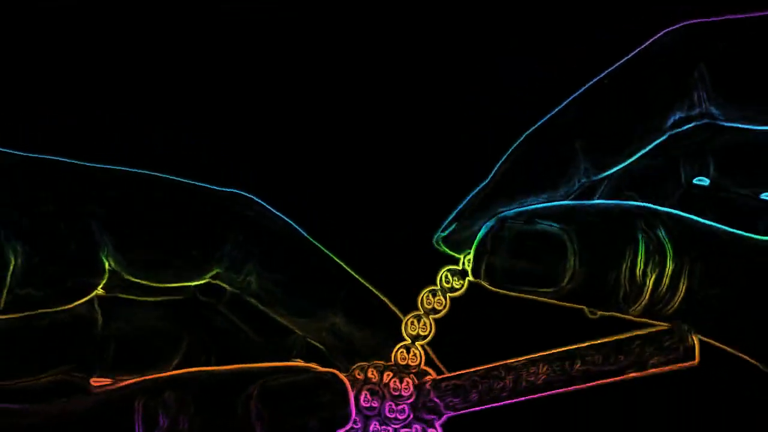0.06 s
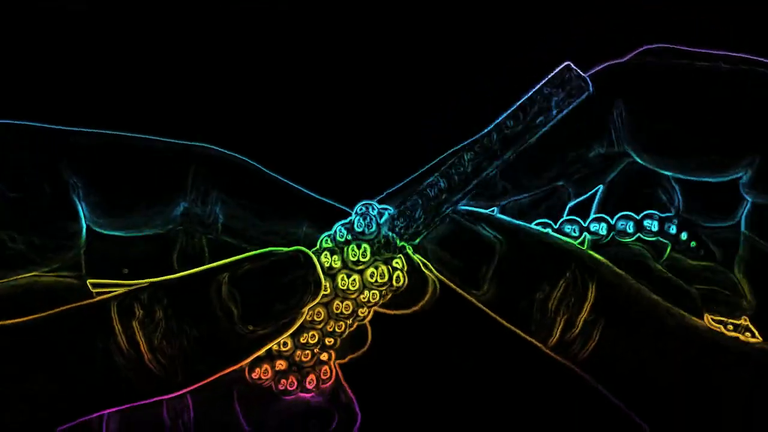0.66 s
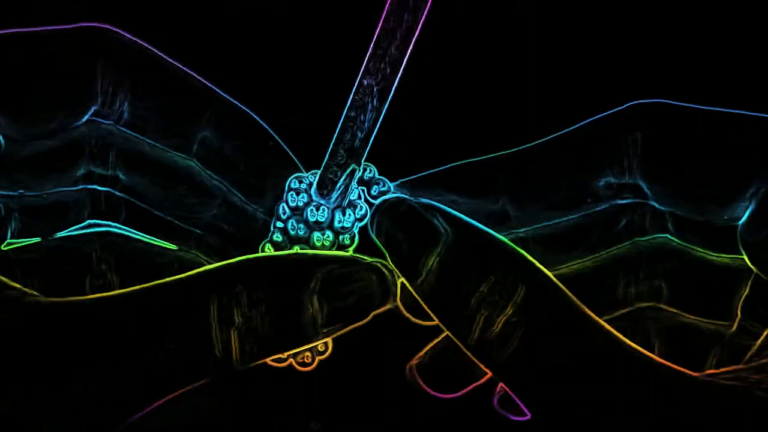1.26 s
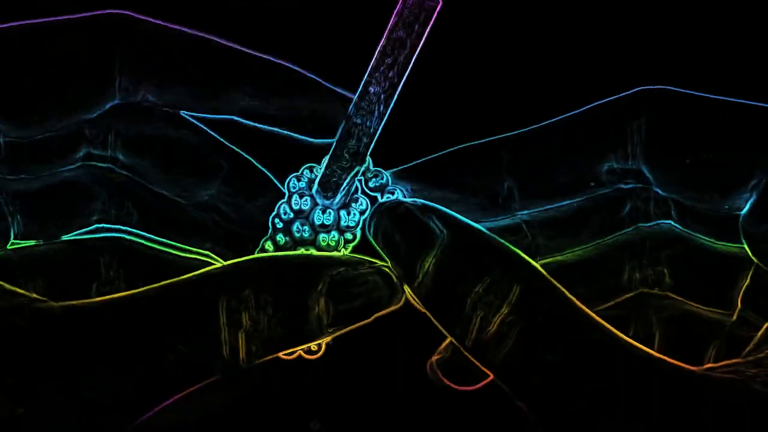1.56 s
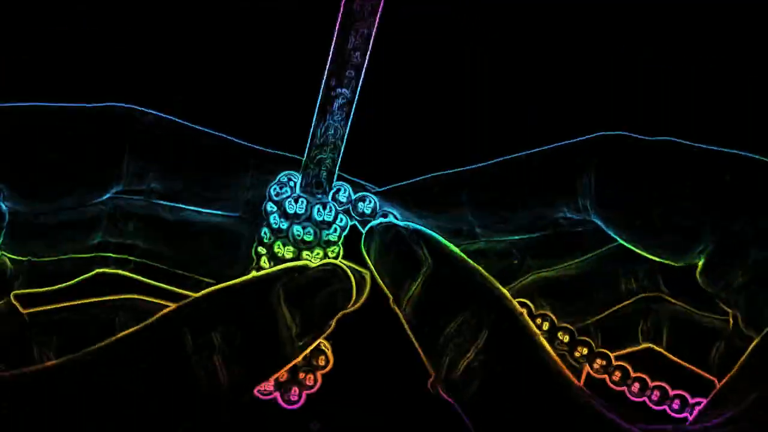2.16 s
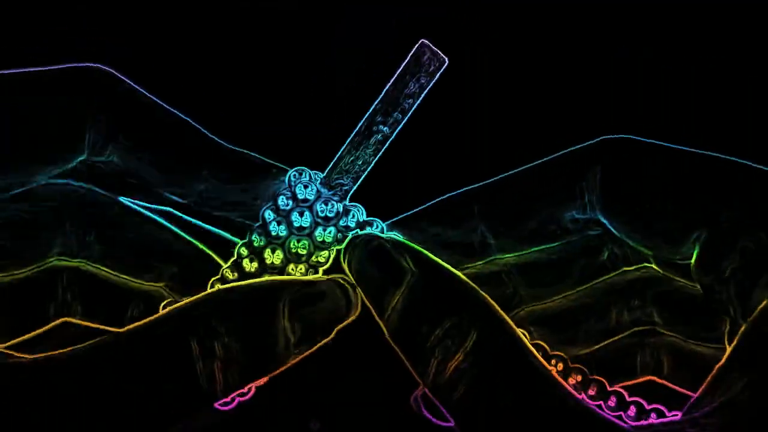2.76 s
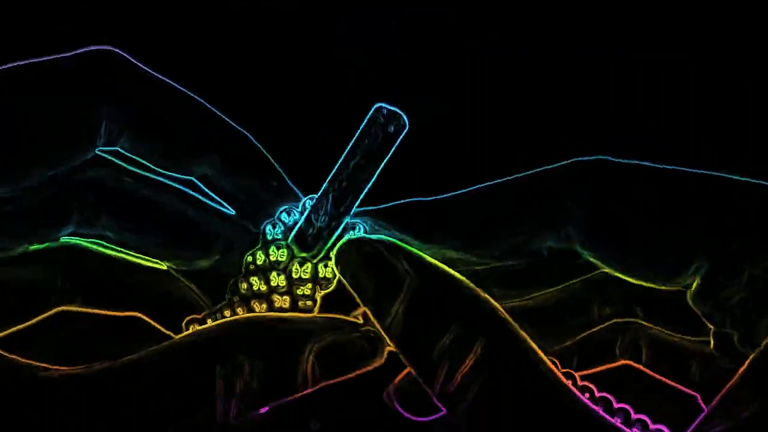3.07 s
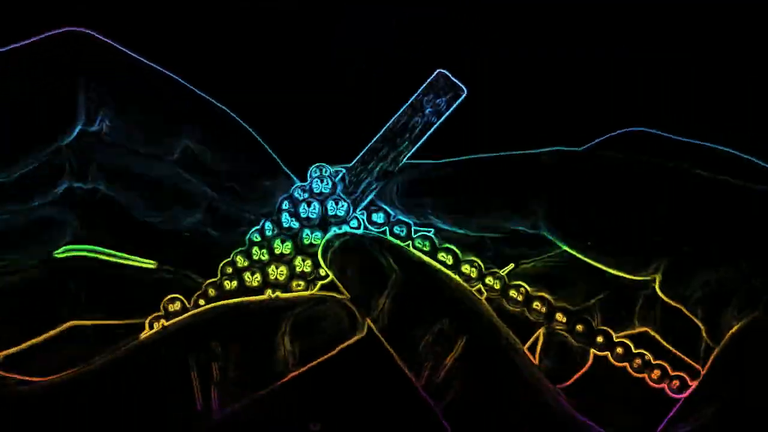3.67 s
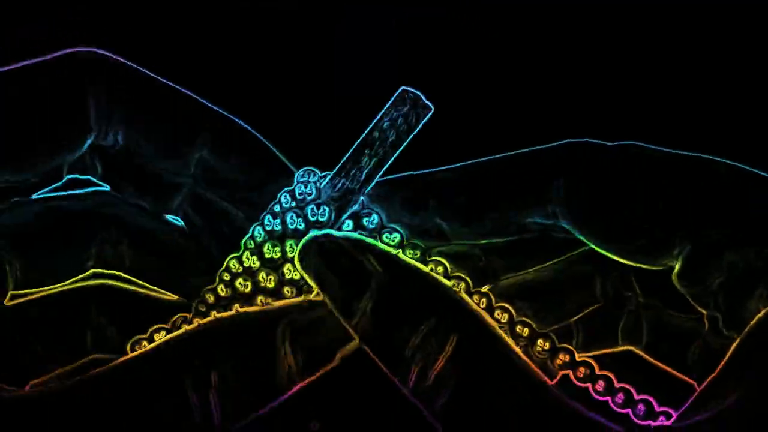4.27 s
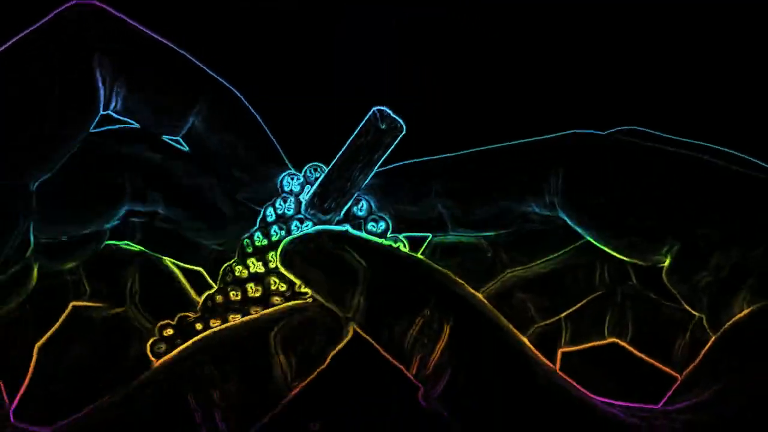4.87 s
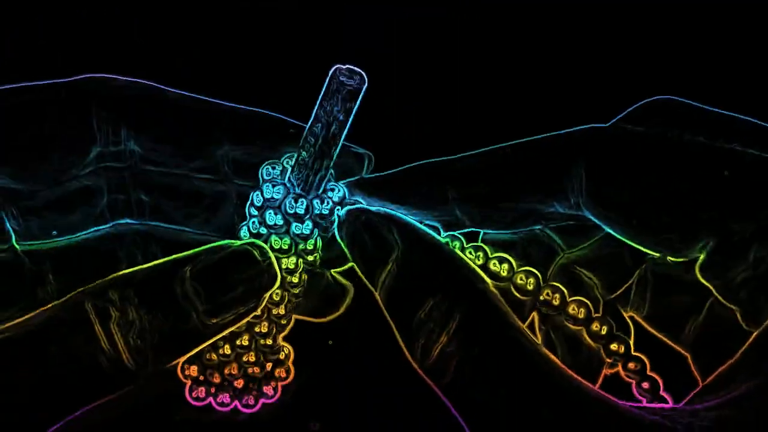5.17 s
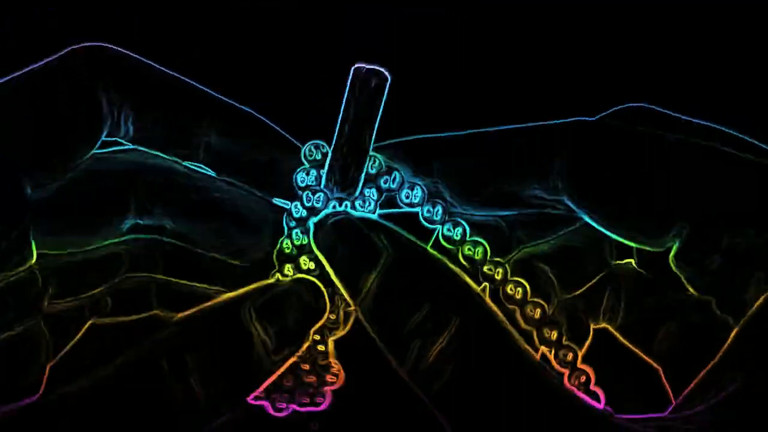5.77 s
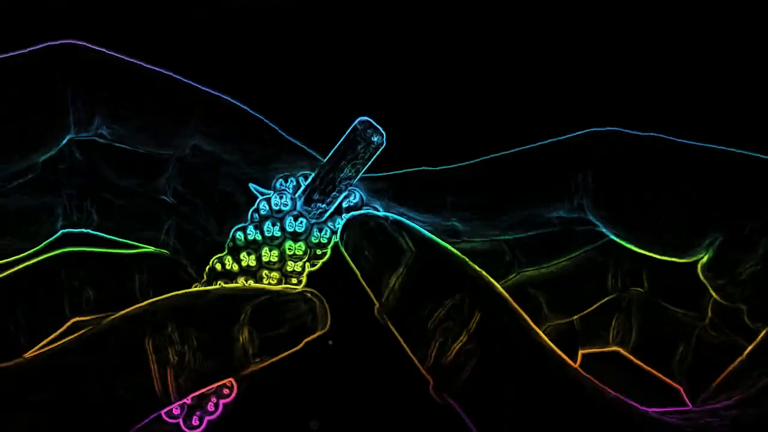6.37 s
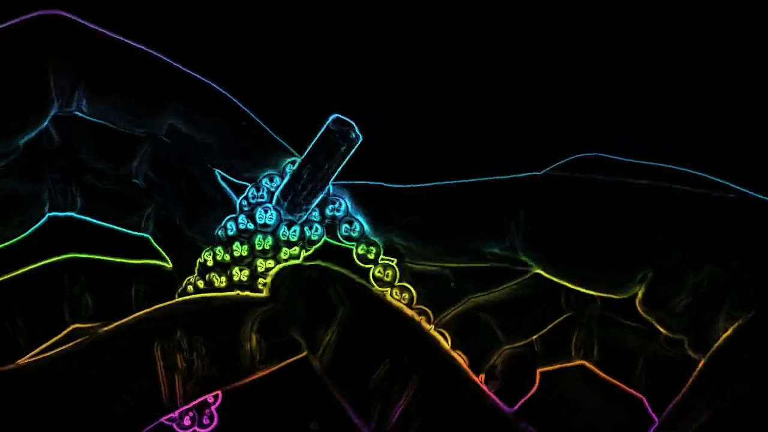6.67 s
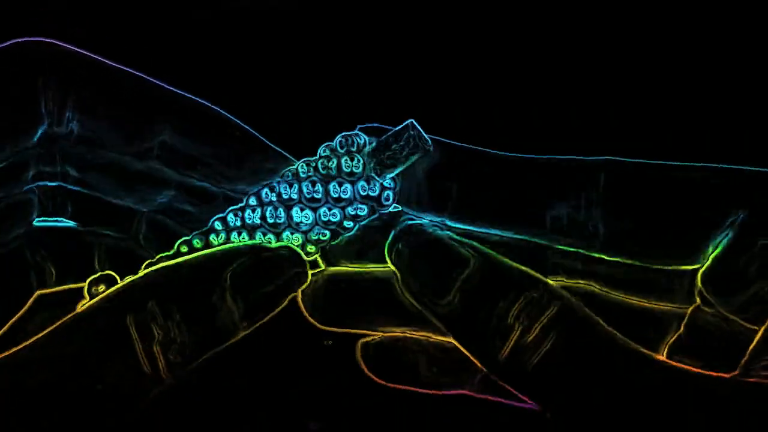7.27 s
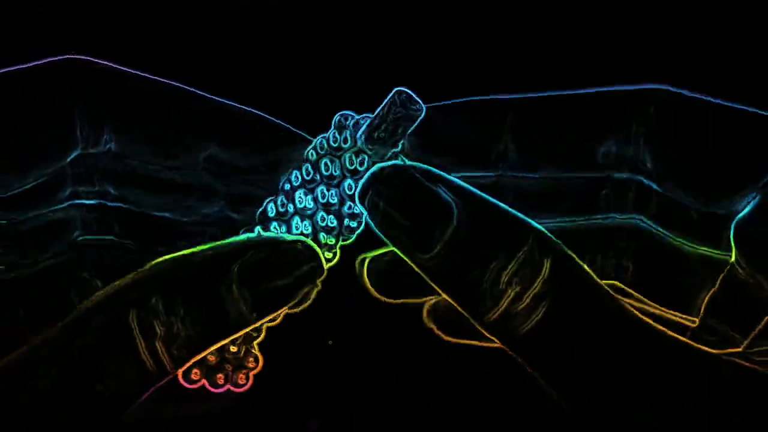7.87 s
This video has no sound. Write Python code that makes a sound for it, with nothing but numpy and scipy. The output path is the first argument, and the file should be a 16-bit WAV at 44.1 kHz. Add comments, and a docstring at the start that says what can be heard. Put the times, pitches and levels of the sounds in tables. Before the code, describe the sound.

Close, irregular clicks and sharp metallic snaps of little magnetic balls joining together, between soft finger swishes and hand rustles.

```python
"""A quiet, dry room; close to the microphone, fingers wind a chain of small magnetic balls round a rod.
Balls jump onto the cluster with sharp snaps or settle with soft ticks: the packed steel rings and the rod
knocks. In between, balls slide on each other and fingertips swish over them, at times with a faint squeak.
The hands add dull rustles over a low room rumble. The loudest snap overloads the microphone input."""
import sys
import numpy as np
from scipy import signal
from scipy.fft import rfft, irfft, next_fast_len
from scipy.io import wavfile

SR = 44100
rng = np.random.default_rng(int(sys.argv[2]) if len(sys.argv) > 2 else 0)


def wrap_up_sound(samples):
    """Save the sound to the file named by the first command line argument, as 16-bit audio."""
    columns = np.atleast_2d(samples).T
    # keep every value between -1 and 1, then stretch to whole-number steps
    tamed = np.clip(columns, -1, 1)
    steps = np.round(tamed * 32767).astype(np.int16)
    wavfile.write(sys.argv[1], SR, steps)


N = 348831
TIME = np.arange(N) / SR

# balls landing on the cluster: t/s, ring level/dB, ring f/Hz, hardness/dB (adds crack), rod knock level/dB
LANDINGS = [(.6343, -54, 5200, -24, -67), (0.6453, -46.5, 4940, -30, -65), (0.655, -48, 5430, -22, -53),
            (.7082, -22.5, 8000, 9, -30), (.9737, -23.5, 7000, 2, -34.5), (1.0693, -24, 5300, -12, -48),
            (2.0513, -20, 7460, -9, -44.5), (2.4061, -23.5, 6770, -14, -44), (2.6599, -31, 6730, -24, -43),
            (3.0023, -43, 1650, -6, -57), (3.176, -30, 3700, -38, -52), (3.2292, -46, 3800, -35, -57),
            (3.423, -19.5, 3060, 1.5, -37), (3.6664, -57.5, 1790, -4, -57.5),
            (3.8269, -46.5, 6700, -16, -53), (4.1237, -31, 2350, -18, -34), (4.296, -56.5, 5450, -14, -55),
            (5.2625, -19, 3200, -.5, -55), (5.4747, -35, 2940, -45, -72), (5.5145, -30.5, 3830, -50, -59),
            (5.6469, -38, 3800, -42, -58.5), (5.7386, -17, 4250, -12, -47), (5.9971, -41, 3200, -38, -62),
            (6.1152, -59, 4490, -33, -77), (6.3086, -57, 4840, -22, -60.5), (6.6365, -12, 4500, -5, -44),
            (6.6467, -13.5, 4420, -6, -38), (6.7252, -43.5, 4640, -28, -63),
            (6.8766, -40, 4240, -40, -54.5), (6.889, -31.5, 4300, -42, -49),
            (7.0479, -29.5, 4400, -30, -44.5), (7.3507, 1, 5290, -3.5, -24)]


def from_db(db):
    """Decibels to gain."""
    return 10 ** (np.asarray(db) / 20)


def rms_one(x):
    """Scale to an rms of 1."""
    return x / np.sqrt(np.mean(x ** 2) + 1e-20)


def energy_one(x):
    """Scale to a total energy of 1."""
    return x / np.sqrt(np.sum(x ** 2) + 1e-20)


def add(track, s, sound):
    """Mix a sound into a track from second s on."""
    start = max(int(round(s * SR)), 0)
    part = sound[:max(N - start, 0)]
    track[start:start + len(part)] += part


def band(x, low_hz, high_hz, order=2):
    """Causal band-pass."""
    sections = signal.butter(order, [low_hz, min(high_hz, .45 * SR)], "band", fs=SR, output="sos")
    return signal.sosfilt(sections, x + 1e-18)


def resonance(x, low_hz, high_hz):
    """One resonance, 3 dB down at the two given frequencies."""
    low, high = np.tan(np.pi * np.minimum([low_hz, high_hz], .45 * SR) / SR)
    width, centre = high - low, low * high
    feedback = [1 + width + centre, 2 * (centre - 1), 1 - width + centre]
    return signal.lfilter([width, 0, -width], feedback, x + 1e-18)


def steep_resonance(x, hz, spread):
    """A resonance applied twice, so that its skirts are steep."""
    edges_hz = hz / (1 + spread), hz * (1 + spread)
    return resonance(resonance(x, *edges_hz), *edges_hz)


def coloured_noise(colour, size):
    """Noise of rms 1 whose spectrum follows rows of f/Hz, level/dB."""
    hz, db = np.transpose(colour)
    padded = next_fast_len(size)
    bins_hz = np.maximum(np.fft.rfftfreq(padded, 1 / SR), 1)
    gain = from_db(np.interp(np.log(bins_hz), np.log(hz), db))
    low_cut = np.minimum(bins_hz / hz[0], 1) ** 2
    spectrum = rfft(rng.standard_normal(padded)) * gain * low_cut
    return rms_one(irfft(spectrum, padded)[:size])


def room_tone():
    """The room's low rumble and a faint, steady hum."""
    # rumble spectrum: f/Hz, relative level/dB
    rumble_colour = [(18, 0.5), (38, 1), (52, -11), (70, -13), (105, -28.5), (220, -24.5), (550, -42),
                     (1200, -51), (2300, -56.5), (4000, -58.5), (8000, -64), (16000, -73)]
    rumble_db, hum_db, hum_hz = -54.5, -76.5, 295
    rumble = from_db(rumble_db) * coloured_noise(rumble_colour, N)
    hum = from_db(hum_db) * np.sqrt(2) * np.sin(2 * np.pi * hum_hz * TIME)
    return rumble + hum


def reflections(x, early_db, early_t60, late_db, late_t60):
    """Dense first reflections from hands and table, then a short faint tail from the walls."""
    # spectra of the first reflections and of the tail: f/Hz, relative level/dB
    early_colour = [(300, 0), (800, 1.5), (1500, 2.5), (3500, 1.5), (7000, -1.5), (11000, -4),
                    (16000, -3.5)]
    late_colour = [(300, -1), (800, 5), (1500, 9), (3500, 4), (7000, -1), (11000, -4), (16000, -3)]
    t = np.arange(SR // 3) / SR
    early = coloured_noise(early_colour, len(t)) * from_db(-60 * t / early_t60) * (t > .0015)
    late = coloured_noise(late_colour, len(t)) * from_db(-60 * t / late_t60) * (t > .011)
    response = from_db(early_db) * energy_one(early) + from_db(late_db) * energy_one(late)
    return signal.fftconvolve(x, response)[:N]


def hand_rustle(wander_per_s=34, wander_db=3.0, trim_db=-.2):
    """The moving hands rustle softly throughout; the level wanders at random."""
    # outline of the rustle, before trim and wander: t/s, level/dB
    outline = [(0.08, -74), (0.55, -58.5), (0.9, -68.5), (1.15, -58), (1.95, -64), (2.35, -56),
               (2.87, -68.5), (3.2, -60.5), (3.9, -63.5), (4.45, -62.5), (5.08, -63.5), (5.2, -71.0),
               (5.45, -63.5), (5.92, -61), (6.35, -71), (6.92, -61), (7.25, -67.5), (7.9, -64.5)]
    # rustle spectrum: f/Hz, relative level/dB
    rustle_colour = [(80, -26), (115, -12.5), (150, -3.5), (175, -3), (205, 3), (235, -1), (260, -6),
                     (300, -6.5), (380, -14), (470, -19.5), (620, -35), (1200, -35), (2500, -49),
                     (16000, -77.5)]
    rustle = coloured_noise(rustle_colour, N)
    level_db = np.interp(TIME, *np.transpose(outline)) + trim_db
    knots_s = np.arange(0, TIME[-1] + 1, 1 / wander_per_s)
    wander = np.interp(TIME, knots_s, rng.standard_normal(len(knots_s)))
    return from_db(level_db + wander_db * wander) * rustle


def friction(strokes, slips_per_s, uneven_db, spread, smooth_db):
    """Tiny random slips excite a broad resonance in each stroke (t/s, rise/s, fall/s, level/dB, f/Hz)."""
    out = np.zeros(N)
    for s, rise, fall, level_db, hz in strokes:
        t = np.arange(-int(rise * SR), int(2 * fall * SR)) / SR
        swell = np.sin(np.pi / 2 * (1 + t / rise)) ** 2
        fade = from_db(-20 * np.abs(t / fall) ** 1.4)
        pressure = np.where(t < 0, swell, fade)
        sizes = from_db(uneven_db * np.minimum(rng.exponential(1, len(t)), 4))
        signs = rng.choice([-1, 1], len(t))
        slips = rms_one(sizes * signs * (rng.random(len(t)) < slips_per_s / SR))
        grain = slips + from_db(smooth_db) * rng.standard_normal(len(t))
        narrowing = min(1, (1900 / hz) ** 1.4)   # steel on steel rings higher and narrower than skin
        ringing = steep_resonance(grain, hz, spread * narrowing)
        damped = band(ringing, hz / 3, hz * 1.85, order=3)   # the fingers swallow the top
        add(out, s - rise, from_db(level_db) * pressure * rms_one(damped))
    return out


def grip_shifts(rise_share=.4, palm_hz=84, palm_offset_db=-3, palm_ceiling_db=-53):
    """Each shift of grip is a rustle of the fingers and a thud in the soft palm."""
    # shifts of grip: peak t/s, fall/s, level/dB, centre f/Hz
    shifts = [(0.239, .035, -63, 380), (1.215, 0.084, -52, 399), (1.53, .18, -44.5, 152),
              (2.385, 0.096, -52, 409), (2.72, .12, -55.5, 120), (3.01, .07, -53, 240),
              (3.18, .11, -53, 338), (3.46, .06, -51.5, 333), (5.99, .05, -61, 390), (6.89, .08, -62, 374)]
    fingers = [(s, rise_share * fall, fall, db, hz) for s, fall, db, hz in shifts]
    palm = [(s, rise, fall, min(db + palm_offset_db, palm_ceiling_db), palm_hz)
            for s, rise, fall, db, _ in fingers]
    return friction(fingers + palm, slips_per_s=490, uneven_db=0, spread=.32, smooth_db=1.5)


def fingertip_squeaks():
    """Skin sticks and slips briefly on smooth metal: a faint, nearly pure tone."""
    # squeaks: t/s, length/s, f/Hz, level/dB
    squeaks = [(4.238, 0.063, 1650, -74), (5.316, 0.08, 988, -68), (6.287, 0.026, 2070, -78)]
    out = np.zeros(N)
    for s, length, hz, level_db in squeaks:
        t = np.arange(int(length * SR)) / SR
        tone = rms_one(steep_resonance(rng.standard_normal(len(t)), hz, spread=.0047))
        add(out, s, from_db(level_db) * np.sin(np.pi * t / length) * tone)
    return out


def cluster_resonances(x, stretch=1):
    """The cluster's short resonances stand out of whatever excites it; stretch scales their pitches."""
    # modes of the packed balls on the rod: f/Hz, width/Hz, gain/dB
    modes = [(3540, 23, -5.5), (4690, 200, -3), (5270, 73, -7), (5870, 220, -4), (6710, 160, -2.5),
             (7700, 260, -0.5), (9140, 500, -5.5), (14100, 2100, -1.5)]
    out = x
    for hz, width_hz, gain_db in modes:
        centre_hz = stretch * hz
        out = out + from_db(gain_db) * resonance(x, centre_hz - width_hz / 2, centre_hz + width_hz / 2)
    return out


def rubs_and_slides():
    """Fingertips rub over the balls, balls slide on each other, and the cluster colours it all."""
    # fingertip rubs (the loudest swishes) and ball slides; the two rows at 1100 Hz are the short, dull
    # knocks of the landings at 0.71 and 3.18 s: peak t/s, fall/s, level/dB before the cluster, f/Hz
    contacts = [(0.079, 0.14, -77, 3460), (.07, 0.15, -74.5, 1080), (0.351, 0.063, -80.5, 2760),
                (.648, 0.043, -61, 5950), (.67, .07, -62, 1200), (.69, .05, -57.5, 4160),
                (.712, .03, -53, 1100), (.925, 0.031, -73, 4000), (1.11, 0.077, -59.5, 4000),
                (1.44, 0.057, -80.5, 3400), (1.615, 0.056, -60, 4600), (1.79, 0.052, -77, 1200),
                (2.315, .14, -69, 3000), (2.53, 0.07, -78.5, 3500), (2.765, .04, -66.5, 1893),
                (3.177, .035, -53, 1100), (3.195, 0.039, -55.5, 3780), (3.335, .035, -73, 3380),
                (3.99, 0.18, -63.5, 1400), (4.055, .05, -52, 1700), (4.085, 0.098, -44, 1900),
                (4.48, 0.054, -71.5, 3400), (4.58, 0.044, -71, 3300), (4.685, 0.17, -67, 2500),
                (4.768, .1, -43.5, 1900), (4.94, .065, -66, 1910), (5.205, .11, -50.5, 3250),
                (5.417, .03, -62.5, 3600), (6.40, 0.041, -72.5, 4700), (6.82, 0.038, -71.5, 4666),
                (7.864, 0.26, -43, 1900)]
    # a firm stroke starts quickly, a lighter one more slowly
    firm_rise_s, firm_db, slower_s_per_db = .017, -42, .0008
    strokes = [(s, firm_rise_s + slower_s_per_db * max(firm_db - db, 0), fall, db, hz)
               for s, fall, db, hz in contacts]
    # each landed ball grinds into its seat, louder after a stronger blow
    seat_delay_s, seat_rise_s, seat_fall_s, seat_hz = .018, .019, .049, 3300
    seating = [(s + seat_delay_s, seat_rise_s, seat_fall_s, -50 + .4 * ring_db, seat_hz)
               for s, ring_db, *_ in LANDINGS]
    # the fingertip drags on for longer, and louder the lower the stroke sounds
    skin_hz, lag_s, db_per_octave = 1200, .025, -7.2
    skin = [(s + lag_s, rise + lag_s, 1.25 * fall, db - 2.5 + db_per_octave * np.log2(hz / skin_hz), skin_hz)
            for s, rise, fall, db, hz in strokes + seating]
    rubbing = friction(strokes + seating + skin, slips_per_s=2600, uneven_db=3.5, spread=.8, smooth_db=-4)
    return from_db(-1.4) * cluster_resonances(rubbing)


def chatter(t, bounce_decay_s, bounce_db, link_width_hz, balls=7):
    """A blow smears in passing from ball to ball (one allpass each); tiny bounces follow at once."""
    blow = 1.0 * (t == 0)
    radius = np.exp(-np.pi * link_width_hz / SR)
    for hz in (np.arange(balls) + rng.random(balls)) / balls * SR / 4:
        feedback = [1, -2 * radius * np.cos(2 * np.pi * hz / SR), radius * radius]
        blow = signal.lfilter(feedback[::-1], feedback, blow + 1e-18)
    bounces = t * np.exp(-t / bounce_decay_s) * rng.standard_normal(len(t))
    return blow + from_db(bounce_db) * energy_one(bounces)


def struck_cluster(force, ring_db, ring_hz, hardness_db, knock_db, spread):
    """The cluster rings at a pitch set by how it is held, with steel crack above and rod knock below."""
    # a gentle, soft contact lasts longer and is duller
    top_hz = 23500 * 2 ** ((ring_db + .35 * hardness_db) / 42)
    # a light blow rings only a few balls, other ones each time
    stretch = 1 + .0045 * min(ring_db + 7.5, 0) * rng.uniform(-1.3, 1)
    vibration = cluster_resonances(band(force, 100, top_hz, order=8), stretch)
    ring = band(steep_resonance(vibration, ring_hz, spread), ring_hz / 5, 1.95 * ring_hz, order=4)
    crack = band(vibration, 5300, 17000)
    knock = band(band(vibration, 1100, 2700), 500, 3100, order=3)
    crack_db = ring_db + hardness_db + 2
    parts = (ring_db, ring), (crack_db, crack), (knock_db, knock)
    snap = sum(from_db(db) * energy_one(part) for db, part in parts)
    return snap * np.sqrt(SR / 1000)   # levels count as rms over 1 ms


def ball_snaps():
    """Balls jump onto the cluster: the sound at the microphone, and a broader one thrown into the room."""
    near, thrown = np.zeros(N), np.zeros(N)
    t = np.arange(SR // 40) / SR
    impulse = 1.0 * (t == 0)
    thump = energy_one(band(np.exp(-t / .0002), 300, 1100, order=3))
    for s, ring_db, ring_hz, hardness_db, knock_db in LANDINGS:
        force = chatter(t, bounce_decay_s=.00041, bounce_db=-3.5, link_width_hz=1400)
        direct = struck_cluster(force, ring_db, ring_hz, hardness_db, knock_db, spread=.27)
        broad = struck_cluster(impulse, ring_db, ring_hz, hardness_db, knock_db + 4.5, spread=.81)
        jolt = from_db(knock_db + 7.5 + .3 * ring_db) * thump   # hard blows also jolt the hand
        # light touches lie hidden behind the fingers, so more of them arrives by reflection
        hidden_db = -.13 * (ring_db + 25)
        add(near, s, direct + jolt)
        add(thrown, s, from_db(hidden_db) * broad + jolt)
    return near, thrown


def scene():
    """One close microphone: snaps, rubs, slides and grips with their reflections, over the background."""
    background = room_tone() + hand_rustle()
    near, thrown = ball_snaps()
    rubbing = rubs_and_slides() + fingertip_squeaks()
    grips = grip_shifts()
    room = reflections(thrown + rubbing + grips, early_db=-9, early_t60=.047, late_db=-17.5, late_t60=.19)
    return (near + rubbing + grips + room + background)[None]


def record(dry):
    """The loudest snap overloads the input, with no bass in the distortion; the top treble is cut."""
    ceiling, distortion_low_hz, cutoff_hz = 1.1, 347, 16300
    excess = dry - np.clip(dry, -ceiling, ceiling)
    overloaded = dry - band(excess, distortion_low_hz, SR / 2, order=1)
    low_pass = signal.ellip(10, .2, 70, cutoff_hz, fs=SR, output="sos")
    return signal.sosfilt(low_pass, overloaded)


dry = scene()
out = record(dry)
wrap_up_sound(out)
```